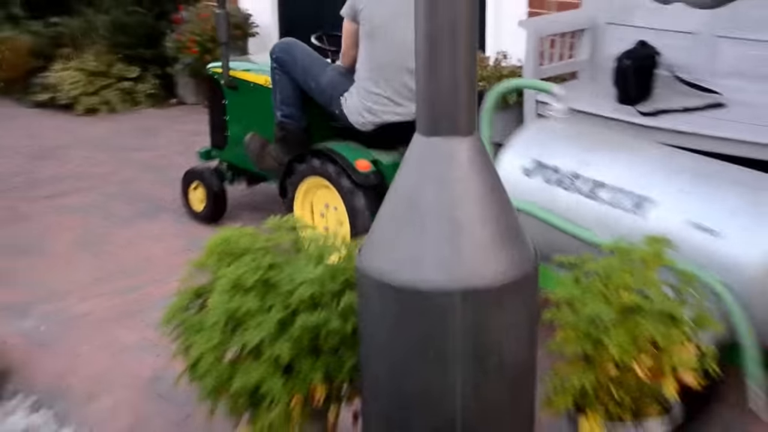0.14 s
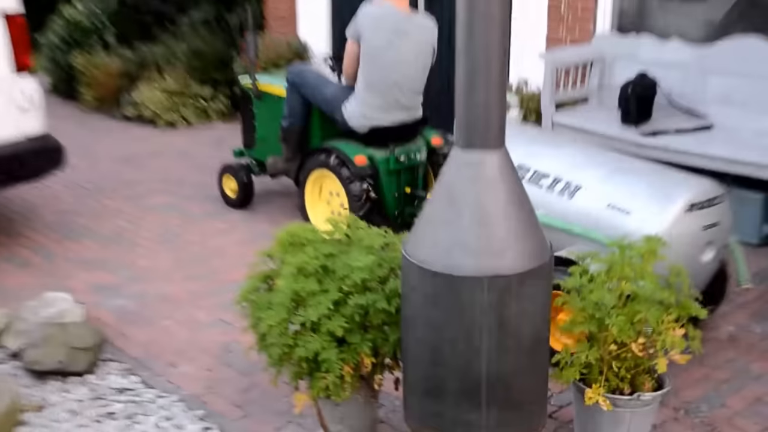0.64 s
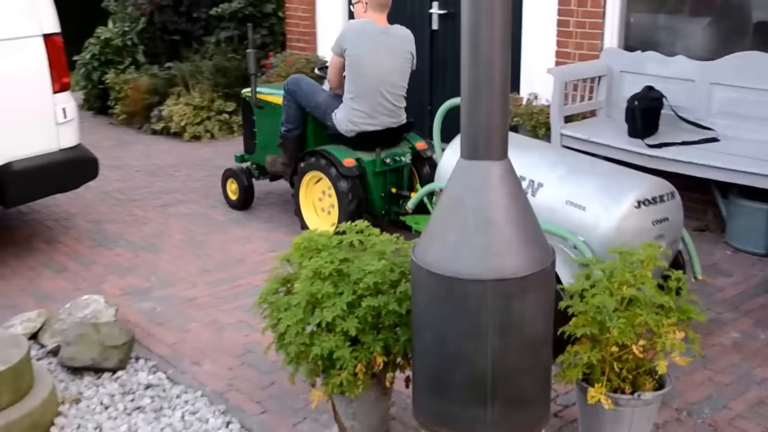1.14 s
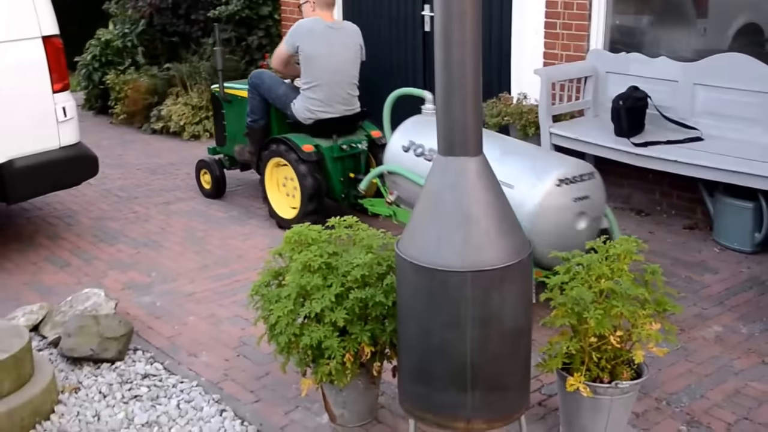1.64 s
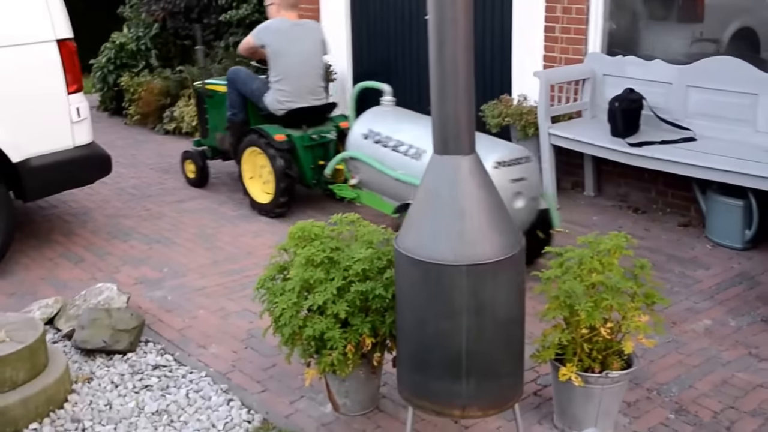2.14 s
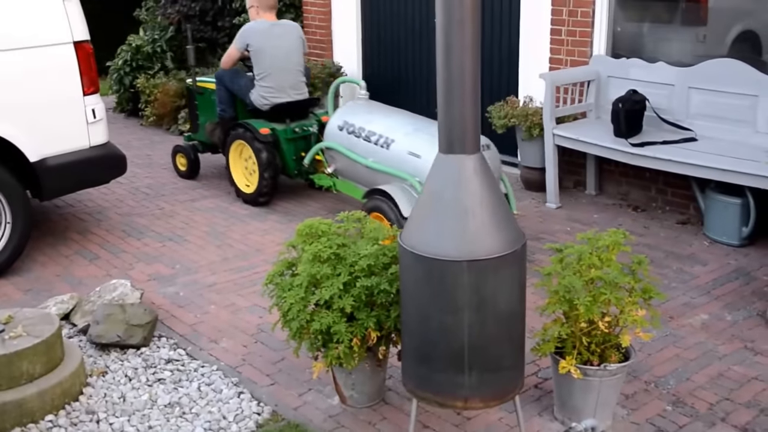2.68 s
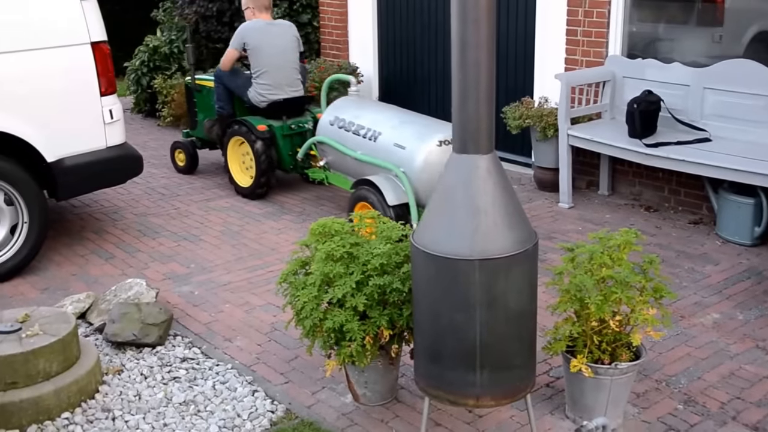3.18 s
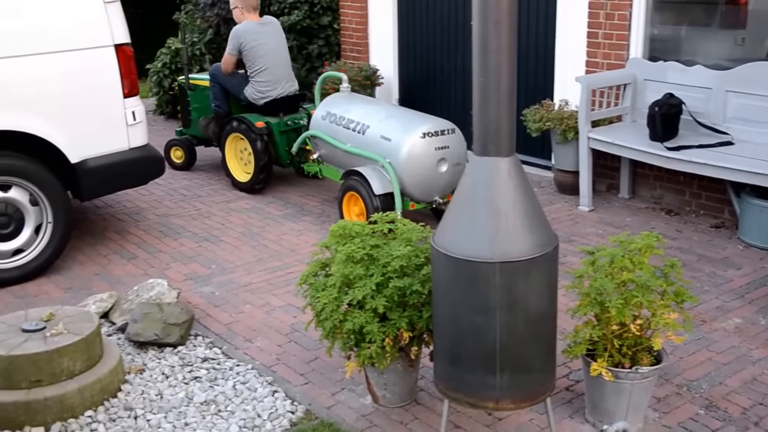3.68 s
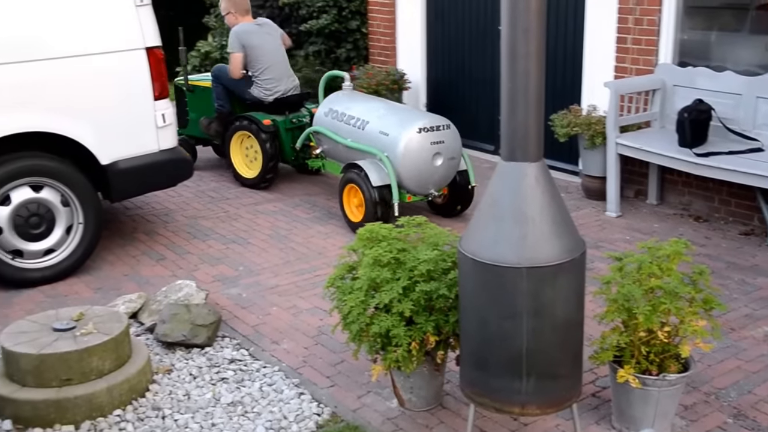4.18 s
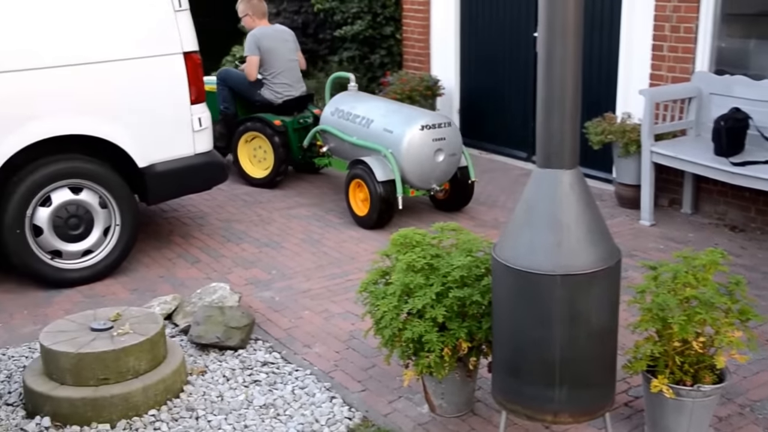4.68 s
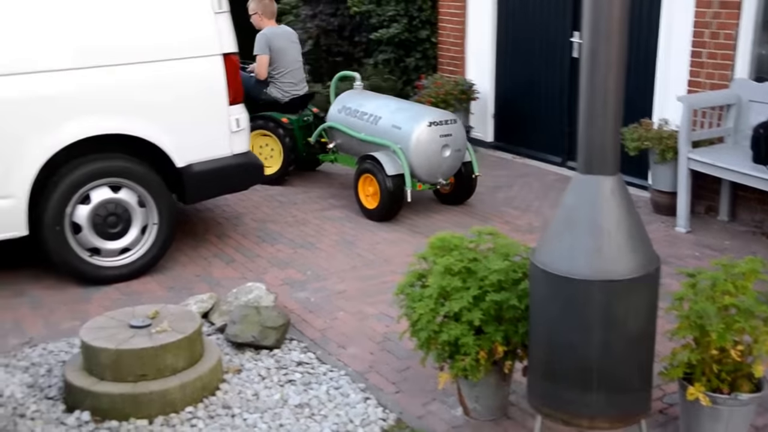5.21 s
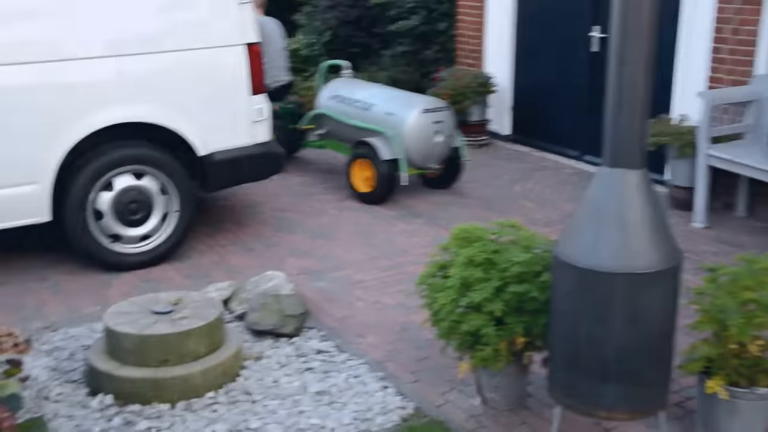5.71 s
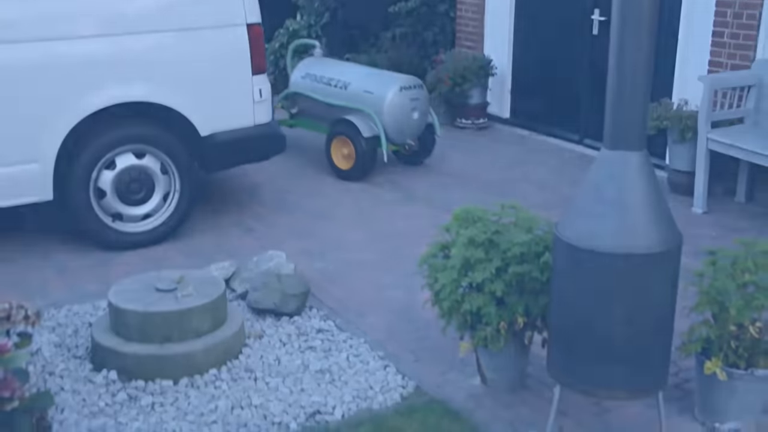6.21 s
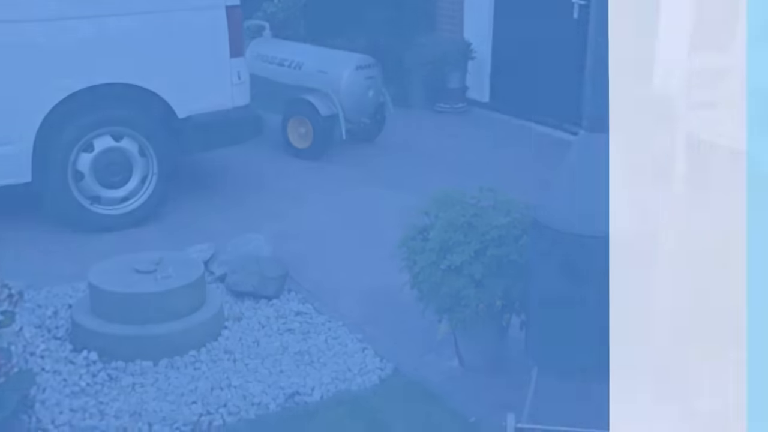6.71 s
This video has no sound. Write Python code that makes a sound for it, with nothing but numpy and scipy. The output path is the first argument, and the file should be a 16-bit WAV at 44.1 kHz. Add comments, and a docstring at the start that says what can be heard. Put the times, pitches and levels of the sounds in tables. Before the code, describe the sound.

A small single-cylinder tractor engine slows from a rapid putter to a loose, clattering chug, nearly stalls, bangs back, and rolls away into silence.

```python
"""In a paved yard, a slow single-cylinder tractor engine drops from a fast tick-over to a putter and rolls off.
Each exhaust blow-down excites damped modes of the silencer and their returns off the walls. Valves, gears
and combustion knock at fixed crank angles: filtered noise bursts rattle the block, modes thump the frame.
Clacks, loose panels, three bangs and a crank-locked hum join in, over tyre rumble, a short yard tail and
a faint whine. The sound dims behind a van and is faded out."""
import sys
import numpy as np
from scipy import signal
from scipy.fft import rfft, irfft
from scipy.io import wavfile
from scipy.ndimage import uniform_filter1d

SR = 44100
rng = np.random.default_rng(int(sys.argv[2]) if len(sys.argv) > 2 else 0)


def pcm_store(signal):
    """Save signal as 16-bit PCM."""
    levels = np.round(np.clip(np.atleast_2d(signal), -1, 1) * 32767)
    wavfile.write(sys.argv[1], SR, levels.astype(np.int16).T)


def rack_gain(trim_db):
    """Turn a fader trim in dB into the linear factor to multiply a signal by."""
    fader = np.asarray(trim_db, float)
    return 10 ** (fader / 20)


N = 302085

# engine speed: time_s, rate_cycles_per_s
ENGINE_SPEED = [(0.0, 20.088), (0.21, 20.151), (1.06, 16.074), (1.79, 11.607), (2.38, 9.423), (2.82, 7.632),
                (2.96, 7.64), (3.25, 9.427), (3.63, 9.762), (4.32, 9.935), (4.69, 9.85), (5.65, 9.801),
                (6.0, 8.538), (6.46, 8.865), (6.85, 7.245)]
# distance, van and final fade: time_s, rattle_level_db, relative_blow_down_level_db (added to the rattle)
HEARD_LEVEL = [(0, -23, 15), (.4, -28.5, 19), (.85, -26, 16.5), (1.6, -28, 15), (2.2, -29, 15),
               (2.9, -33, 13.5), (3.6, -31.5, 14), (4.3, -33.5, 11), (4.8, -36, 11.5), (5.4, -40, 13),
               (5.8, -44, 13), (6.2, -48, 13), (6.5, -51, 10), (6.85, -64, 12.5)]
# silencer rings and wall returns, each turning at one spot along the way: pitch_hz, t60_s, arrival_ms,
# relative_level_db at the spot, spot_s, rise_db_per_s before it, fall_db_per_s after it
SILENCER_RINGS = [(227.1, 0.32, 4.85, -6.5, 6.1, 5, -5), (311.2, 0.048, 1.12, -2.5, 4.67, -0.5, 15.5),
                  (530, 0.028, 1.265, -0.5, 2, 8, 0.5), (647, 0.22, 3.33, -10.5, 5.1, 31, 23),
                  (139, 0.12, 3.52, -7, 1.86, 2, 1.5), (203.2, 0.12, 4.92, -8.5, 2.7, 3.5, -0.5),
                  (300.5, 0.037, 5.53, -1.5, 0.89, 0, 10), (462.5, 0.093, 5.49, -6, 4.45, 2.5, 19),
                  (730, 0.12, 8.75, -12, 10, 5.5, 6), (563, 0.068, 7.97, -1.5, 6.6, 2.5, 9),
                  (183, 0.048, 11.21, 2.5, 4.46, 4.5, 17), (769, 0.41, 8.4, -13.5, 5.7, 17, 5),
                  (501, 0.054, 16, -3.5, 5.9, 4.5, 5), (681, 0.027, 16, -8, 3.6, 1.5, 37),
                  (169, 0.069, 10.65, -13, 0.26, 17, 4), (142.7, 0.32, 9.2, -5.5, 5.24, 13, 10),
                  (766, 0.057, 24, -24, 3.1, 15, 17), (298, 0.2, 6.65, -6, 6.85, 12, 4),
                  (302, 0.028, 24.68, -14.5, 2.7, 14, 7), (127, 0.1, 4.24, 0, 0.88, 6.5, 9),
                  (672, 0.052, 1.94, -10.5, 0.86, 13, 14), (813, 0.029, 4.7, -10.5, 0.46, 5, 19),
                  (400, 0.0059, 1.01, -5, 0.97, 5.5, 3.5), (290, 0.047, 2.34, -10, 4.6, 19, 14)]
# later puffs in the pipe: share_of_cycle, then the columns of SILENCER_RINGS
PIPE_PUFFS = [(0.281, 174.9, 0.2, -0.43, -7, 0.84, 5.6, 1.5), (0.2825, 260, 0.097, -0.31, -7, .3, 2, 4.5),
              (0.25, 306, 0.18, 0.3, -18, 2.4, 6, 8), (0.282, 183.6, 0.66, -0.24, -13, 1.73, 19, 4),
              (.73, 173, 0.13, 0.52, -3, 4.37, 11.4, 14), (.73, 226, 0.23, 0.09, -9.5, 6.4, 3.9, -2),
              (0.3367, 227.7, 0.48, 0.19, -15.5, 5.3, 17, 12), (0.41, 752, 0.027, 0.24, -14.5, 1.2, 4, 11),
              (0.98, 109, 0.12, 0.18, -5, 5.1, 4.4, -2), (.58, 830, .5, 0.26, -25, 5.7, 13, 13)]
# crank angles of the knocks after a blow-down, combustion sixth: share_of_cycle
KNOCK_ANGLES = [-.025, .26, .42, .5, .62, .72, .8]
# strength of the knocks at those angles: relative_thud_db, relative_tick_db, share_following_load (0-1)
KNOCK_STRENGTH = [(-37, 18.5, 0.1), (0, 15.5, 0), (-33, 12, 0.1), (11, -7.5, 0.43), (9.5, 12, 0.74),
                  (9, 15, 0.46), (6, 11, 0.63)]
# rattle set off by each knock, strongest twice a cycle: relative_level_db, t60_s
KNOCK_RATTLE = [(6, .15), (-6, .06), (-9, .06), (3.5, .17), (-6, .07), (-3, .12), (-9, .1)]
# the engine nearly stalls, then pulls hard: time_s, load_db
ENGINE_LOAD = [(2.9, 1.5), (2.96, 8), (3.0, 17), (3.12, 4.5), (3.23, 11), (3.33, 3), (3.6, -3)]
# block and bonnet resonances: pitch_hz, width_hz, relative_level_db, relative_steady_whirr_db
BLOCK_MODES = [(573, 560, -1.5, -6.5), (722, 150, 6, -9.5), (1247, 162, -1, -6.5), (1459, 210, -2.5, 2),
               (1730, 410, -4, -9), (2252, 410, 0, -17), (2670, 440, -2, -35), (2964, 140, -3, -17),
               (3304, 30, 1, -25)]
# intake box (first row) and frame, thumped by the knocks: pitch_hz, t60_s, relative_level_db
FRAME_MODES = [(107.7, 0.099, -18), (144, 0.037, -27), (187.6, 0.14, 2), (232, 0.11, 1), (310, 0.22, 0)]
# body shake of the whole machine: frequency_hz, relative_density_db
SHAKE_SPECTRUM = [(60, -40), (100, -12), (175, 1.5), (300, 7.5), (390, -16), (470, -2), (700, -2),
                  (1000, -59)]
# valve ticks and fan air: frequency_hz, relative_density_db
TREBLE_SPECTRUM = [(2500, -7.5), (3500, 3), (4200, -2), (5000, -1), (6500, -11), (8300, -9), (8800, -9),
                   (11500, -18), (13500, -28), (15600, -49), (15900, -71)]
# treble over the rattle: time_s, level_db
TREBLE_LEVEL = [(0, -15.5), (1.5, -17.5), (2.8, -20), (3.6, -18.5), (4.4, -21.5), (5.5, -22.5), (6.85, -22)]
# treble bands that tick each in their own way: low_hz, high_hz
TREBLE_BANDS = [(2000, 5500), (5500, 9000), (9000, 17000)]
# valve cover, clacked at every blow-down: pitch_hz, t60_s, arrival_ms, level_db (over the rattle)
COVER_MODES = [(1486, 0.088, 3.05, 0), (1801, 0.058, 7, -1), (2294, 0.044, 4, -2.5),
               (2706, 0.035, 1.997, -4.5), (3020, 0.051, 5, -6.5), (3390, 0.12, 2.8, -15)]
# hard combustion bangs while the engine pulls out of the near stall: time_s, relative_blow_db
BANG_BLOWS = [(2.9902, -27), (3.112, -26.5), (3.224, -32)]
# block and frame under a bang: pitch_hz, t60_s, relative_level_db
BANG_MODES = [(55, 0.23, -4), (101, 0.39, -3), (153, 0.2, 2), (1110, 0.096, -6), (1135, 0.087, 3),
              (1277, 0.19, -3), (1700, 0.055, 0), (2180, 0.069, -15), (2900, .05, -21), (3560, .06, -18)]
# crank-locked hum: multiple_of_cycle_rate, level_db at the turn, turn_s, rise_db_per_s, fall_db_per_s
HUM_PARTIALS = [(6, -38, 0.11, 6, 57), (9, -17.5, 0.31, -5, 23), (12, -29, 1, 8, 21),
                (20, -31, 0.16, -12, 36), (15, -49, 0.063, 17, 14)]
# loose sheet metal: pitch_hz, t60_s, relative_level_db
LOOSE_MODES = [(900, 0.028, -14), (1187, 0.034, -7), (1535, 0.043, -3), (2027, 0.032, -7.5),
               (2504, 0.064, -13.5), (3120, 0.043, -18.5)]
# tyres on paving: frequency_hz, relative_density_db
RUMBLE_SPECTRUM = [(15, -19), (28, -2), (45, 22), (65, 17), (90, -31.5)]
# faint tone at the top: time_s, level_db
WHINE_LEVEL = [(0, -92), (1.5, -88), (5, -94), (6.7, -105), (6.85, -120)]

# the van hides the sharp blow-down knock and clack from this moment on
VAN_S, VAN_DB_PER_S = 5.62, 5


def unit(x):
    """Normalisation: scales a signal to rms 1."""
    return x / np.sqrt(np.mean(x ** 2))


def curve(points, t):
    """Linear interpolation: the columns of a table at times t."""
    s, *columns = np.transpose(points)
    return [np.interp(t, s, c) for c in columns]


def turn(t, db, at_s, rise_db, fall_db):
    """Two-sided exponential envelope: a level in dB changes at one rate before a moment, another after."""
    return db - rise_db * np.maximum(at_s - t, 0) - fall_db * np.maximum(t - at_s, 0)


def blows(s, size):
    """Impulsive excitation: single-sample impulses at times s."""
    x, i = np.zeros(N), np.round(np.asarray(s) * SR).astype(int)
    keep = (i >= 0) & (i < N)
    np.add.at(x, i[keep], size[keep])
    return x


def fall(t60):
    """Exponential decay: the factor per sample, with t60 at least 3 ms."""
    return np.exp(-np.log(1000) / (max(t60, .003) * SR))


def ring(x, hz, t60):
    """Damped harmonic oscillator: a mode starts from rest, and a unit blow swings it to about 1."""
    r, w = fall(t60), 2 * np.pi * hz / SR
    return signal.lfilter([0, np.sin(w)], [1, -2 * r * np.cos(w), r * r], x)


def gate(x, t60, rise_s):
    """Two cascaded exponential responses: blows become swells that rise quickly and die away."""
    decay = signal.lfilter([1], [1, -fall(t60)], x)
    return signal.lfilter([1 - fall(rise_s)], [1, -fall(rise_s)], decay)


def band(x, lo_hz, hi_hz):
    """Band limitation: a Butterworth band-pass."""
    return signal.sosfilt(signal.butter(2, [lo_hz, hi_hz], "band", fs=SR, output="sos"), x)


def coloured(points):
    """Spectral shaping: Gaussian noise weighted by a frequency table, at rms 1."""
    hz, db = np.transpose(points)
    # 1 Hz is added so that the logarithm exists at zero
    f = np.log(np.arange(N // 2 + 1) * SR / N + 1)
    weight = rack_gain(np.interp(f, np.log(hz), db))
    return unit(irfft(rfft(rng.standard_normal(N)) * weight, N))


def crank():
    """Phase is the integral of speed: cycles from the first blow-down, and the time of every blow-down."""
    t = np.arange(N) / SR
    first_putt_cycles = .259
    cycle = np.cumsum(curve(ENGINE_SPEED, t)[0]) / SR - first_putt_cycles
    return cycle, np.interp(np.arange(int(cycle[-1]) + 1), cycle, t)


def exhaust(s):
    """Impulse excitation of resonators: each blow-down rings the same modes, weighted by tractor position."""
    pop_db, wobble_db, late_ms, faintest_db = 1, 1.7, .12, -42
    db = sum(curve(HEARD_LEVEL, s))
    rows = [(0, *row) for row in SILENCER_RINGS] + PIPE_PUFFS
    wobble = wobble_db * rng.standard_normal((len(s), len(rows)))
    # arrival shifts a little as the gas flow varies
    shift_ms = late_ms * rng.standard_normal((len(s), len(rows)))
    period = np.append(np.diff(s), s[-1] - s[-2])
    out = 0
    for k, (share, hz, t60, arrival_ms, *spot) in enumerate(rows):
        size = rack_gain(db + np.maximum(turn(s, *spot), faintest_db) + wobble[:, k])
        at = s + share * period + (arrival_ms + shift_ms[:, k]) / 1000
        out = out + ring(blows(at, size), hz, t60)
    # the gas pulse is soft-edged and the small outlet radiates little bass
    return rack_gain(pop_db) * band(band(out, 117, 1550), 127, 2150)


def knocks(s):
    """Crank-timed impact: each knock gives a thud, treble swells and rattle swells that follow the load."""
    scatter_db, panel_db, treble_scatter_db = 1.8, 2.6, 1.8
    chance = rng.standard_normal((len(s) - 1, len(KNOCK_STRENGTH), 2 + len(BLOCK_MODES)))
    uneven = rng.standard_normal((len(s) - 1, len(KNOCK_STRENGTH), len(TREBLE_BANDS)))
    hits, tick_gates = 0, np.zeros((len(TREBLE_BANDS), N))
    # the rattle rests on a steady whirr
    rattle_gates = np.outer(rack_gain(np.transpose(BLOCK_MODES)[3]), np.ones(N))
    for k, ((thud_db, tick_db, loaded), (rattle_db, t60)) in enumerate(zip(KNOCK_STRENGTH, KNOCK_RATTLE)):
        at = s[:-1] + KNOCK_ANGLES[k] * np.diff(s)
        load_db = loaded * curve(ENGINE_LOAD, at)[0]
        hits = hits + blows(at, rack_gain(thud_db + load_db + scatter_db * chance[:, k, 0]))
        # the van dims the blow-down knock only
        if k == 0:
            load_db = load_db - VAN_DB_PER_S * np.maximum(at - VAN_S, 0)
        for p in range(len(TREBLE_BANDS)):
            db = tick_db + load_db + scatter_db * chance[:, k, 1] + treble_scatter_db * uneven[:, k, p]
            tick_gates[p] += gate(blows(at, rack_gain(db)), 0.57 * t60, 0.012)
        # each knock catches the panels differently, so its colour changes from cycle to cycle
        for p in range(len(BLOCK_MODES)):
            db = rattle_db + load_db + panel_db * chance[:, k, 2 + p]
            rattle_gates[p] += gate(blows(at, rack_gain(db)), t60, 0.022)
    return hits, tick_gates, rattle_gates


def clatter(starts, count):
    """Correlated excitation: noise starts over at every start time and drifts from stroke to stroke."""
    # share of its clatter that a stroke takes from the one two starts before
    repeat = .8
    edge = np.clip(np.round(np.append(starts, N / SR) * SR).astype(int), 0, N)
    size = np.diff(edge).max()
    out, last = rng.standard_normal((count, N)), rng.standard_normal((2, count, size))
    for k, (a, b) in enumerate(zip(edge[:-1], edge[1:])):
        fresh = rng.standard_normal((count, size))
        last[k % 2] = repeat * last[k % 2] + np.sqrt(1 - repeat ** 2) * fresh
        out[:, a:b] = last[k % 2, :, :b - a]
    return out


def block_rattle(s, gates, grain):
    """Resonant filtering of noise: clatter renewed twice a cycle passes through block and bonnet modes."""
    turns = np.sort(np.concatenate([s[:-1] + KNOCK_ANGLES[k] * np.diff(s) for k in (0, 3)]))
    rattle = 0
    for noise, swell, (hz, width, db, _) in zip(clatter(turns, len(BLOCK_MODES)), gates, BLOCK_MODES):
        resonance = signal.iirpeak(hz, hz / width, fs=SR)
        rattle = rattle + rack_gain(db) * signal.lfilter(*resonance, noise * grain * swell)
    # the sheet-metal bonnet shuts off the top of the rattle
    return unit(band(band(rattle, 500, 2780), 330, 2930))


def valve_ticks(gates, grain):
    """Amplitude modulation of noise: treble bands tick with the knocks over the fan's steady air."""
    fan_db = 4  # relative
    noise = coloured(TREBLE_SPECTRUM)
    ticks = grain * sum(band(noise, *edge) * swell for edge, swell in zip(TREBLE_BANDS, gates))
    # the fan's steady air is duller than the ticks
    air = rack_gain(fan_db) * band(coloured(TREBLE_SPECTRUM), 2500, 9300)
    level = rack_gain(curve(TREBLE_LEVEL, np.arange(N) / SR)[0])
    return level * unit(ticks + air)


def frame_thump(hits):
    """Modal response to impact: knocks thump frame and intake box, beside a steady body shake."""
    thud_db, shake_db, boom_db = -14.5, -7.5, -11  # over the rattle
    push = band(hits, 95, 350)
    boom, *rings = (rack_gain(db) * ring(push, hz, t60) for hz, t60, db in FRAME_MODES)
    shake = rack_gain(shake_db) * coloured(SHAKE_SPECTRUM)
    return rack_gain(thud_db) * unit(sum(rings)) + shake + rack_gain(boom_db) * unit(boom)


def engine(s):
    """Superposition: block rattle, valve ticks, frame thump and tyres share one level along the way."""
    # one more cycle at either end
    s = np.concatenate([[2 * s[0] - s[1]], s, [2 * s[-1] - s[-2]]])
    hits, tick_gates, rattle_gates = knocks(s)
    # loose play between gear teeth makes the rattle grainy
    grain_db = 1.4
    grain = rack_gain(grain_db * unit(uniform_filter1d(rng.standard_normal(N), size=120)))
    level = rack_gain(curve(HEARD_LEVEL, np.arange(N) / SR)[0])
    mechanism = block_rattle(s, rattle_gates, grain) + valve_ticks(tick_gates, grain)
    return level * (mechanism + frame_thump(hits) + tyres())


def clack(s):
    """Modal ringing: valve-cover modes vary a little in strength and moment from stroke to stroke."""
    scatter_db, shift_ms = 3, 0.21
    chance = rng.standard_normal((len(s), len(COVER_MODES), 2))
    level_db = curve(HEARD_LEVEL, s)[0] - VAN_DB_PER_S * np.maximum(s - VAN_S, 0)
    out = 0
    for k, (hz, t60, arrival_ms, db) in enumerate(COVER_MODES):
        at = s + (arrival_ms + shift_ms * chance[:, k, 1]) / 1000
        size = rack_gain(level_db + db + scatter_db * chance[:, k, 0])
        out = out + ring(blows(at, size), hz, t60)
    return out


def bangs():
    """Impulse response with broadband onset: a crack of noise over the rings of block and frame."""
    crack_db, crack_t60_s = -18, 0.32
    s, db = np.transpose(BANG_BLOWS)
    hit = blows(s, rack_gain(db))
    # the push of the gas lasts a moment, so the rings start soft
    push = band(band(hit, 72, 3200), 72, 2800)
    rings = sum(rack_gain(mode_db) * ring(push, hz, t60) for hz, t60, mode_db in BANG_MODES)
    noise = band(band(rng.standard_normal(N), 550, 5800), 500, 9900)
    crack = unit(noise * gate(hit, crack_t60_s, 0.004))
    return rings + rack_gain(crack_db) * crack * np.std(gate(hit, crack_t60_s, .003))


def hum(cycle):
    """Harmonic synthesis: sine partials locked to the crank glide with its speed."""
    t = np.arange(N) / SR
    out = 0
    for multiple, *shape in HUM_PARTIALS:
        level = np.sqrt(2) * rack_gain(turn(t, *shape))
        out = out + level * np.sin(2 * np.pi * round(multiple) * cycle)
    return band(out, 69, 1100)


def loose():
    """Random impulse excitation: scattered small jolts ring the loose panels, each in its own mix."""
    jolts_per_s, scatter_db = 90, 2.8
    s = rng.uniform(0, N / SR, int(jolts_per_s * N / SR))
    chance = scatter_db * rng.standard_normal((len(s), len(LOOSE_MODES) + 1))
    level_db = curve(HEARD_LEVEL, s)[0] + chance[:, -1]
    rings = 0
    for k, (hz, t60, db) in enumerate(LOOSE_MODES):
        rings = rings + ring(blows(s, rack_gain(level_db + db + chance[:, k])), hz, t60)
    return rack_gain(-3.5) * band(rings, 660, 3800)


def tyres():
    """Random surface excitation: low noise wanders in level as tyres meet rougher and smoother paving."""
    start_db, slope_db_per_s, walk_db, walk_s = -22, -2.5, 1, 0.246  # start over the rattle
    t = np.arange(N) / SR
    steps = np.arange(0, t[-1] + 1, walk_s)
    walk = walk_db * np.interp(t, steps, rng.standard_normal(len(steps)))
    # the slope turns round at the van
    level_db = start_db + slope_db_per_s * np.minimum(t, 2 * VAN_S - t) + walk
    return rack_gain(level_db) * coloured(RUMBLE_SPECTRUM)


def yard(x):
    """Diffuse reverberation: convolution with decaying noise gives a short tail between brick walls."""
    t60_s, tail_db, tail_db_per_s = 0.57, -16, 1.1
    t = np.arange(SR // 2) / SR
    tail = rng.standard_normal(len(t)) * np.exp(-np.log(1000) * t / t60_s) * (t > .02)
    wet = signal.fftconvolve(x, tail / np.linalg.norm(tail))[:N]
    # the walls count for more as the tractor leaves
    return x + rack_gain(tail_db + tail_db_per_s * np.arange(N) / SR) * wet


def whine():
    """Simple harmonic tone: a thin, barely heard sine at the top of the range."""
    pitch_hz = 15704
    t = np.arange(N) / SR
    return np.sqrt(2) * rack_gain(curve(WHINE_LEVEL, t)[0]) * np.sin(2 * np.pi * pitch_hz * t)


def scene():
    """Linear superposition: the tractor's sources sound in the yard, at one microphone, with the whine."""
    cycle, s = crank()
    tractor = exhaust(s) + engine(s) + clack(s) + bangs() + hum(cycle) + loose()
    return yard(tractor)[None] + whine()


def roll_off(x):
    """The treble ends steeply here."""
    return signal.sosfilt(signal.butter(12, 15800, fs=SR, output="sos"), x)


def record(dry):
    """Soft saturation: the microphone rounds the tallest peaks."""
    ceiling = .8  # of full scale
    return roll_off(ceiling * np.tanh(dry / ceiling))


dry = scene()
out = record(dry)
pcm_store(out)
```